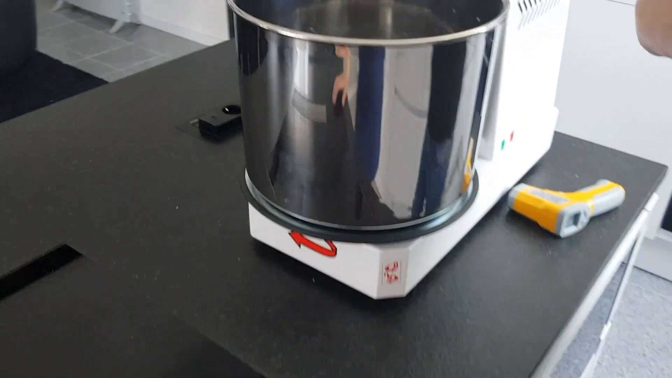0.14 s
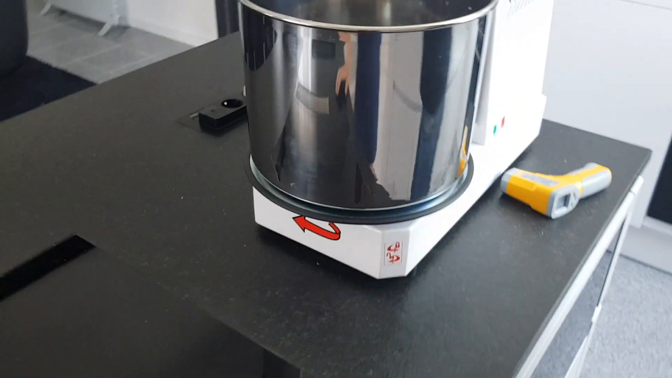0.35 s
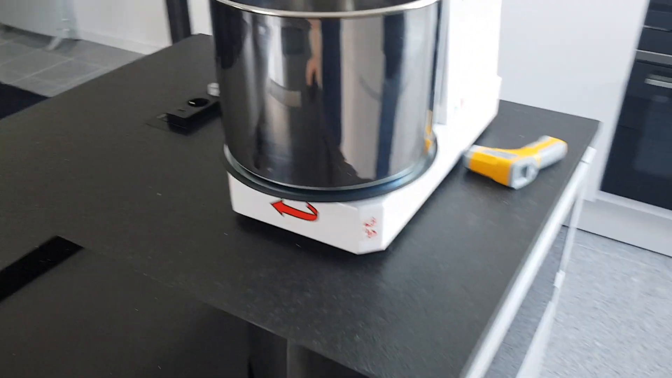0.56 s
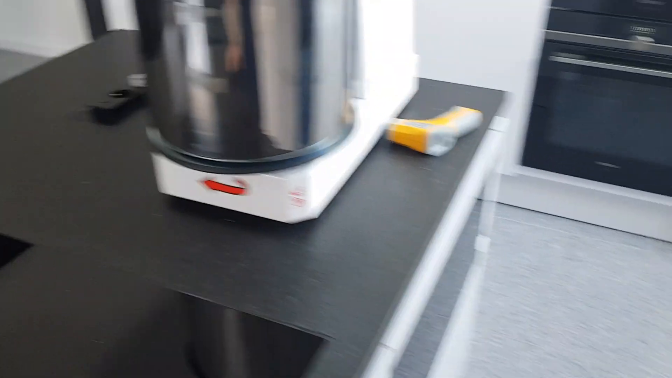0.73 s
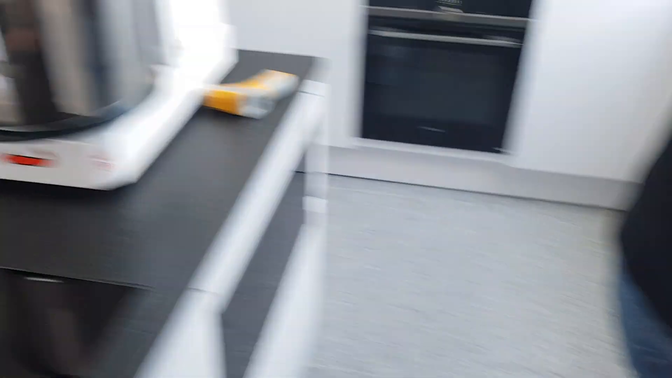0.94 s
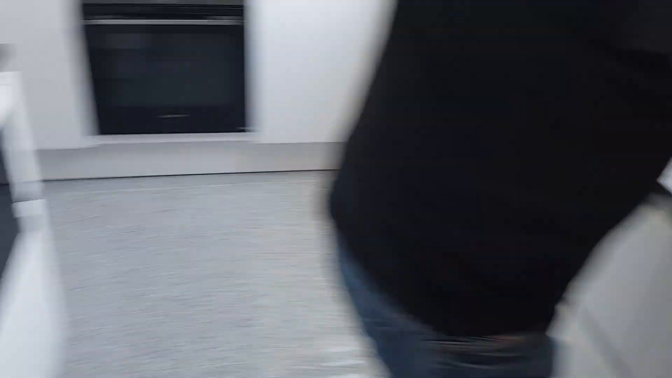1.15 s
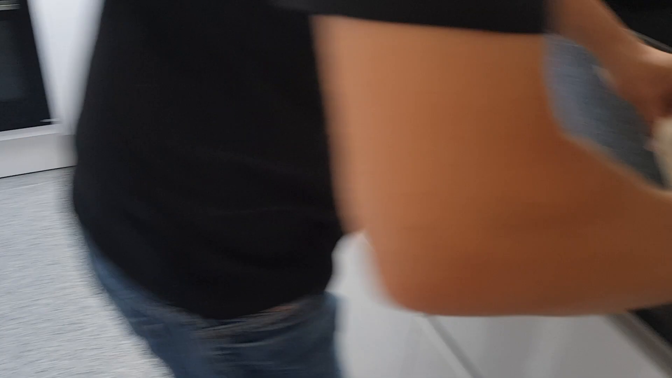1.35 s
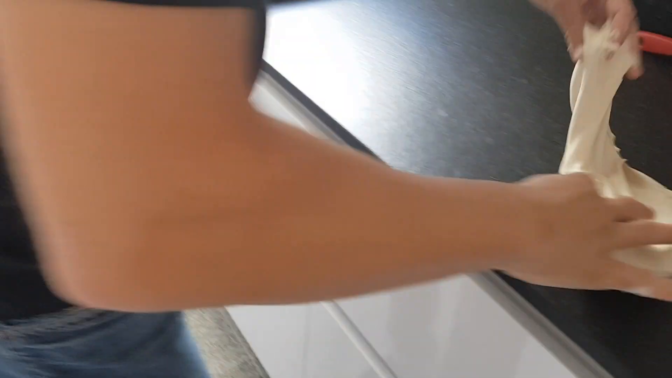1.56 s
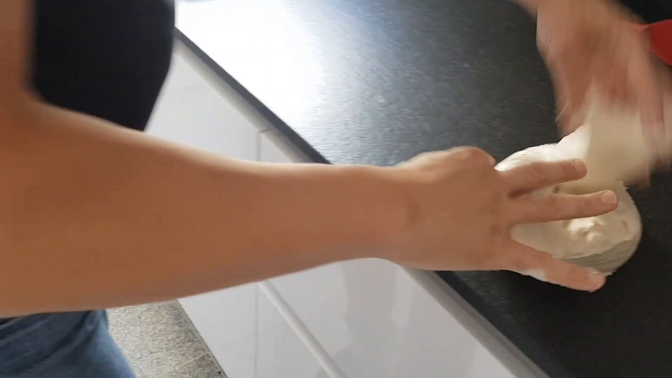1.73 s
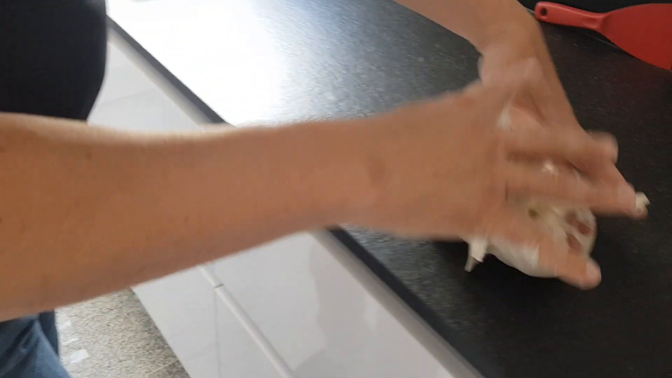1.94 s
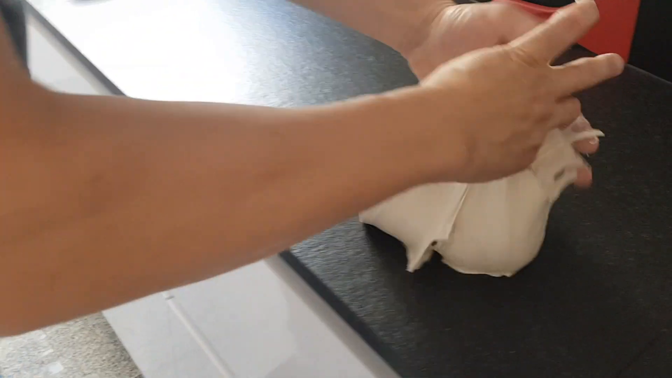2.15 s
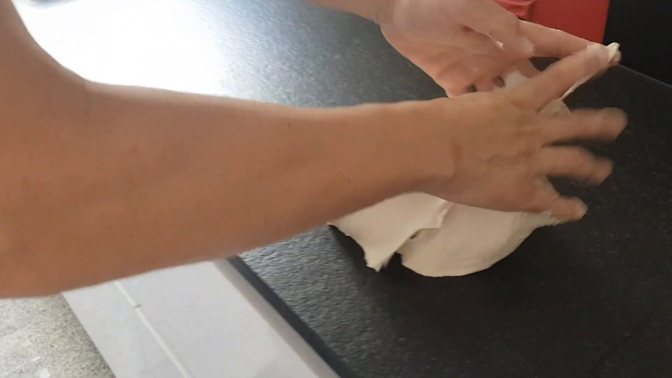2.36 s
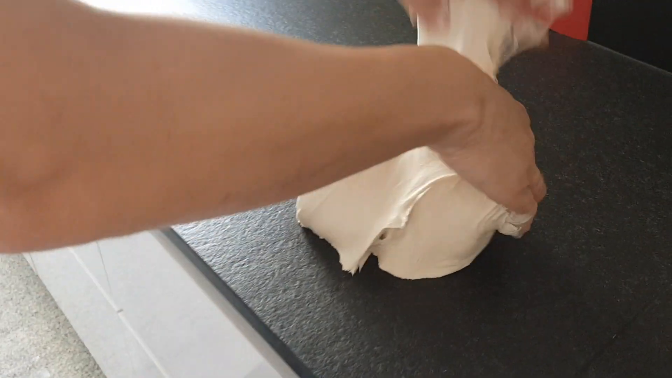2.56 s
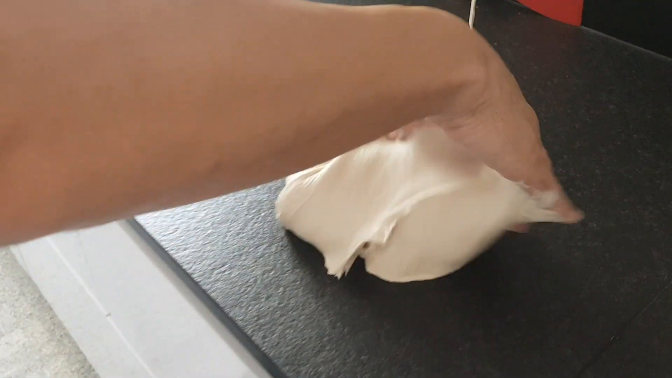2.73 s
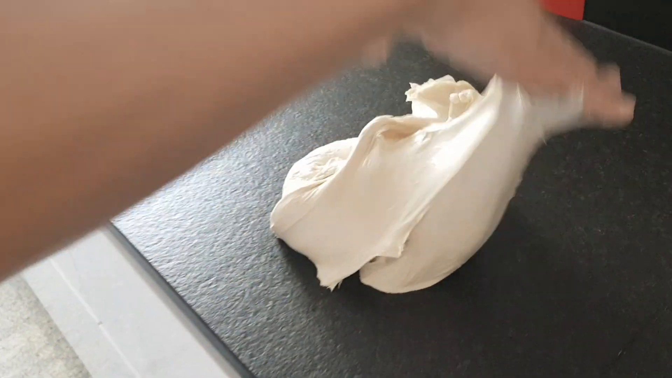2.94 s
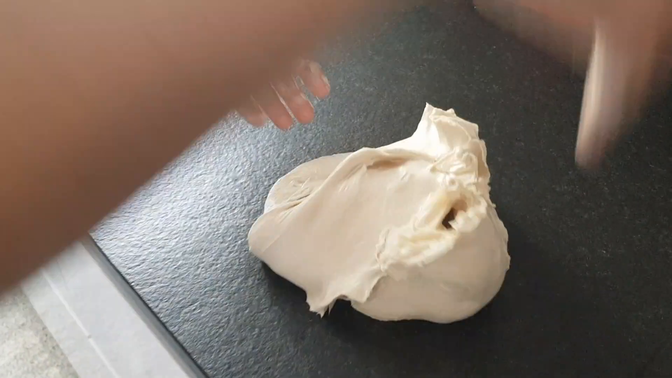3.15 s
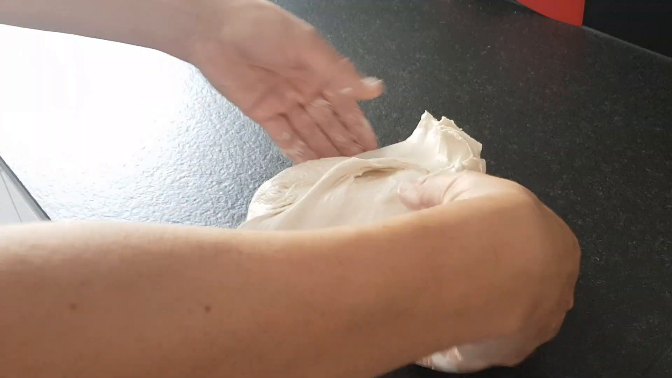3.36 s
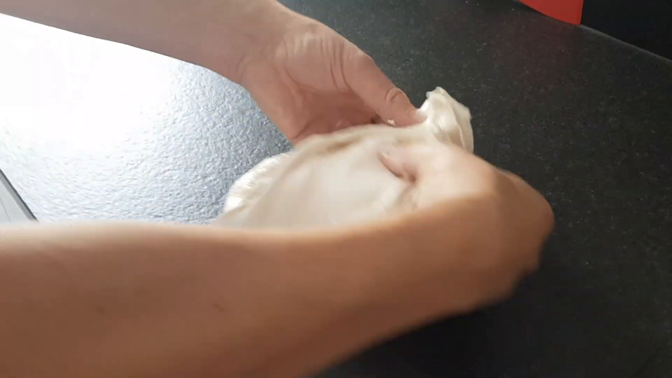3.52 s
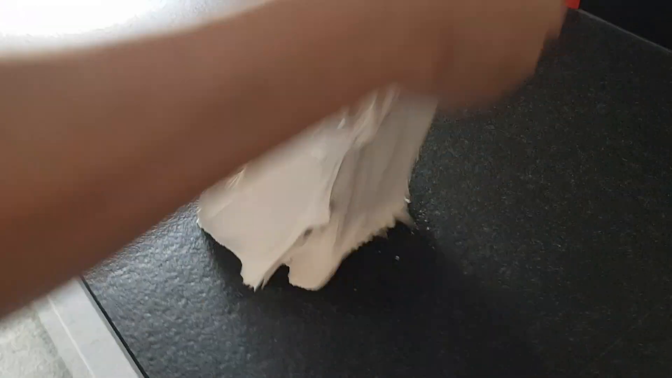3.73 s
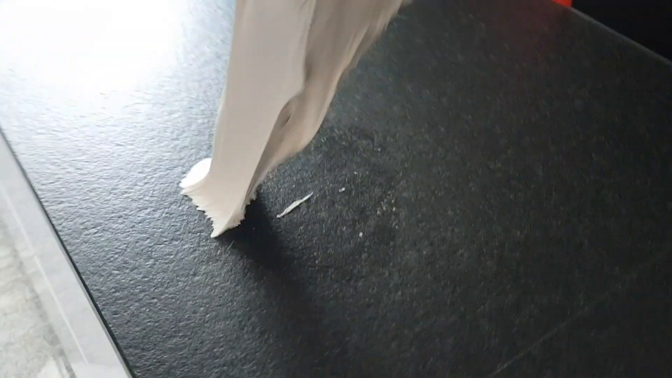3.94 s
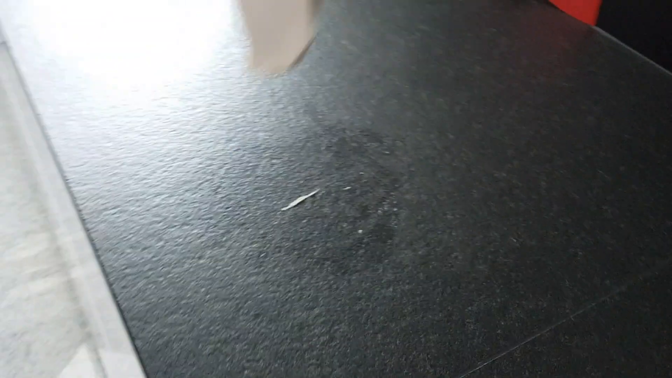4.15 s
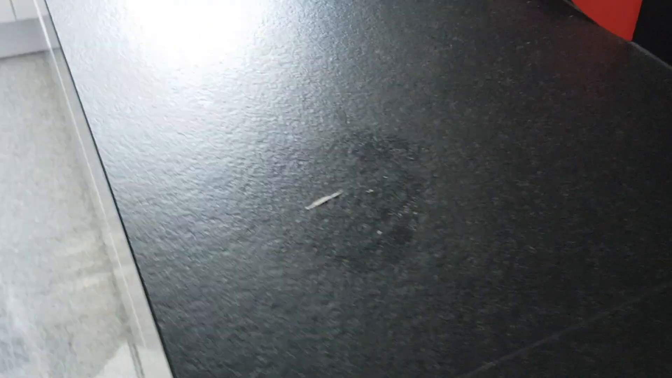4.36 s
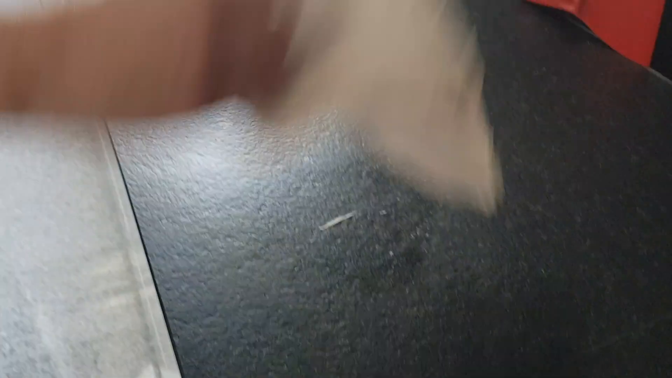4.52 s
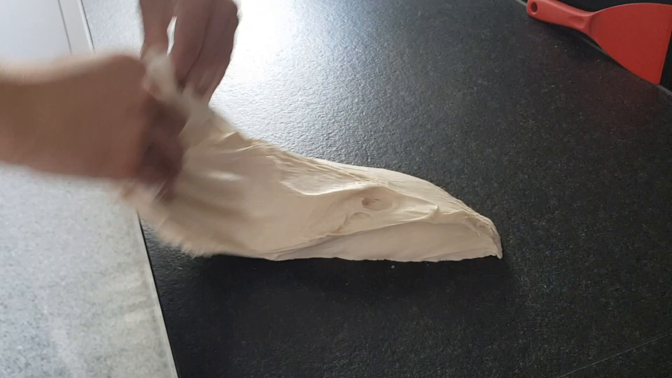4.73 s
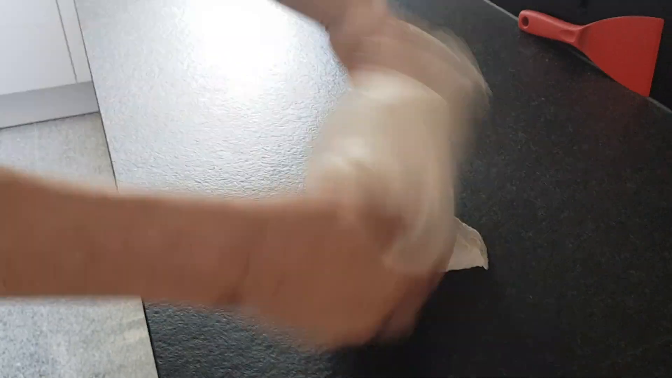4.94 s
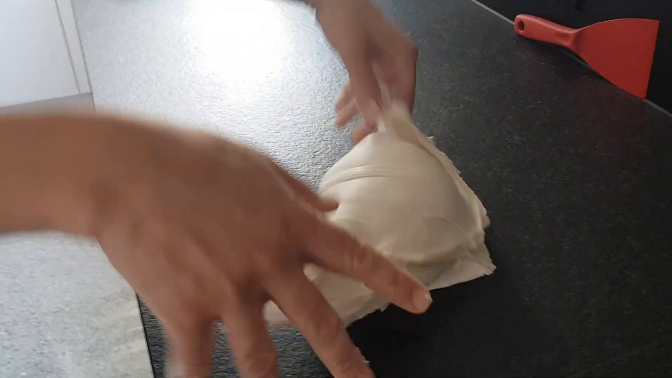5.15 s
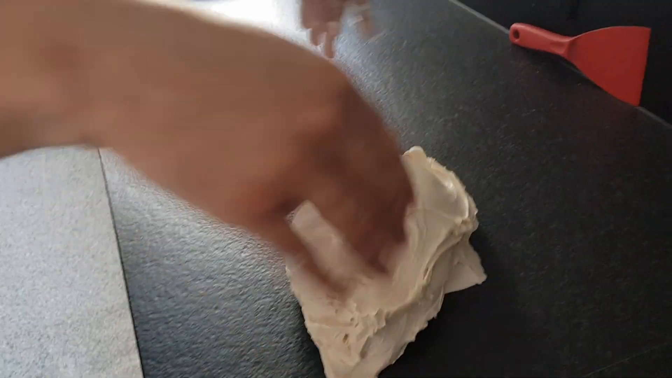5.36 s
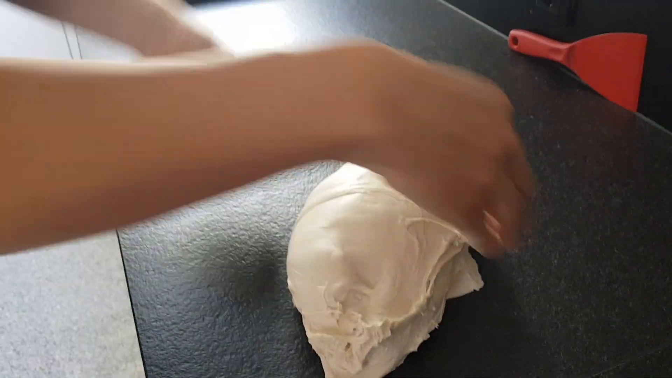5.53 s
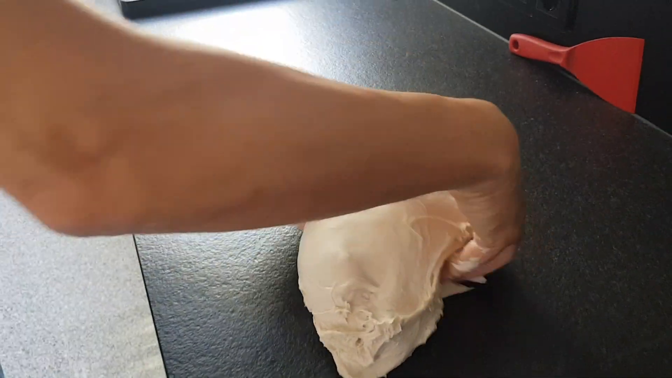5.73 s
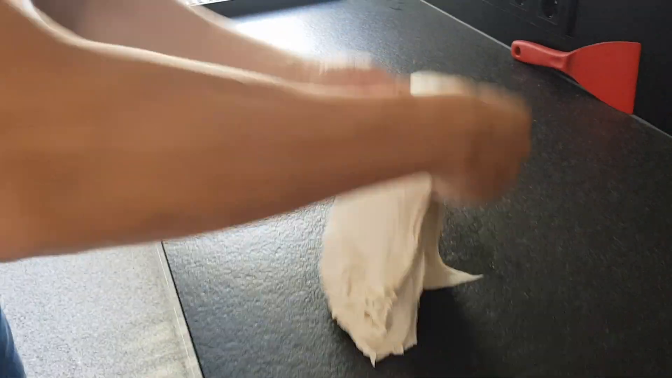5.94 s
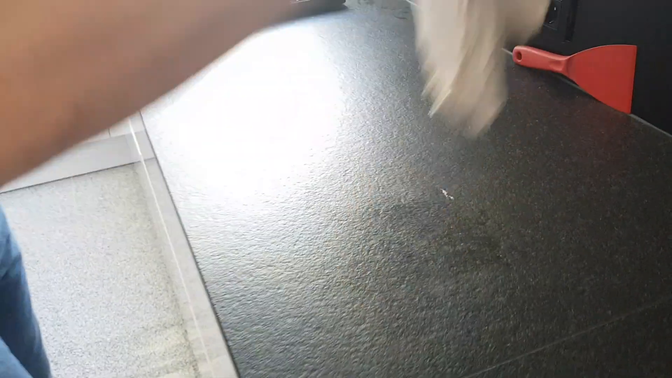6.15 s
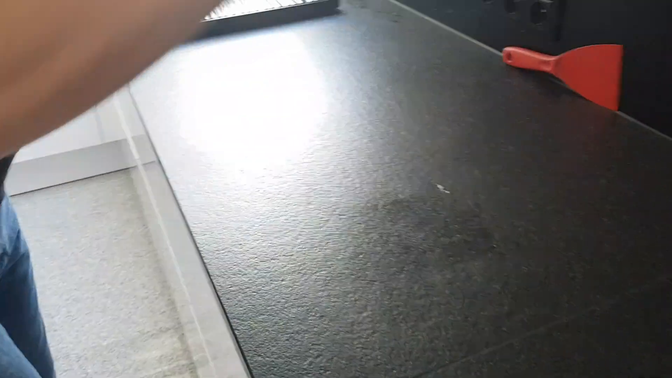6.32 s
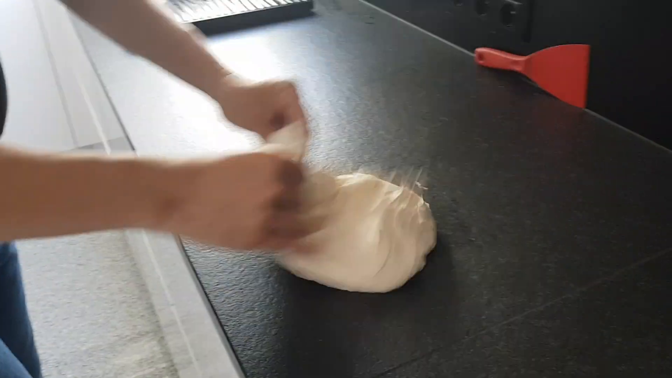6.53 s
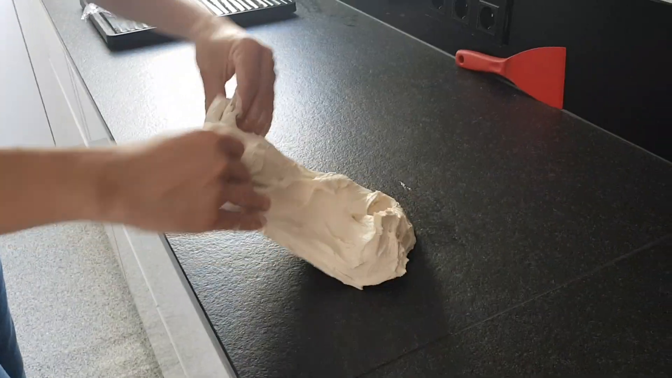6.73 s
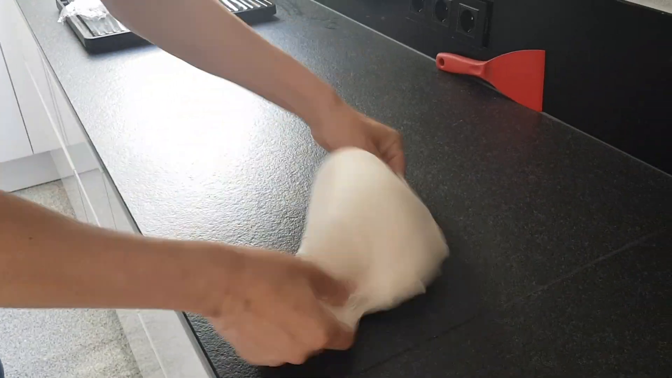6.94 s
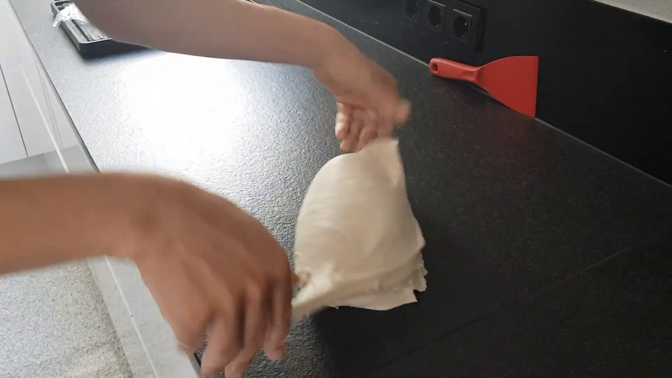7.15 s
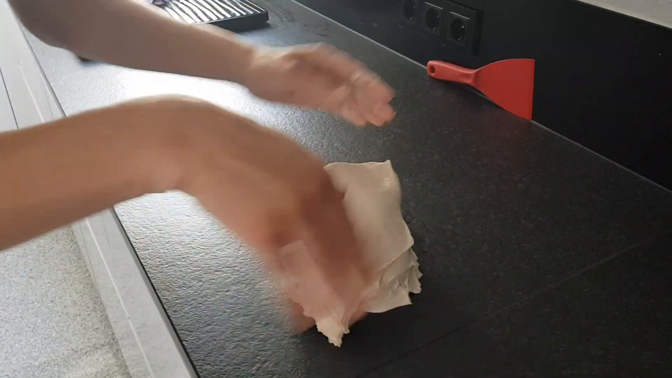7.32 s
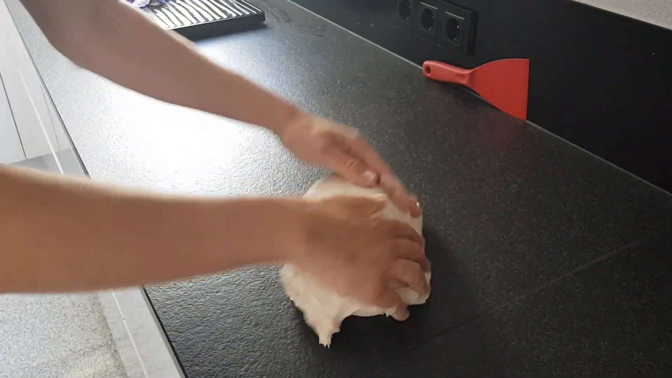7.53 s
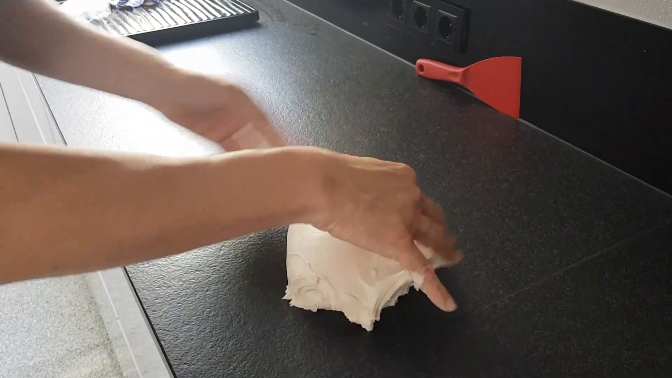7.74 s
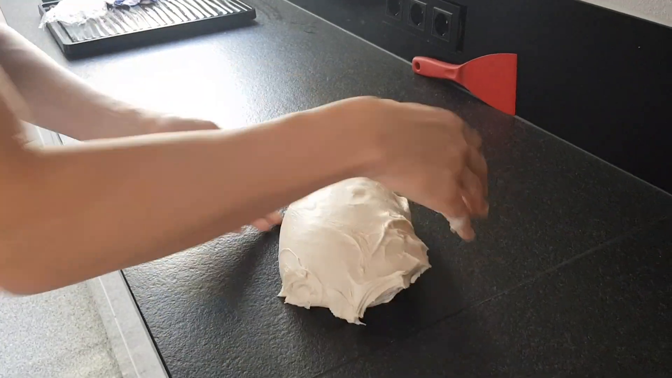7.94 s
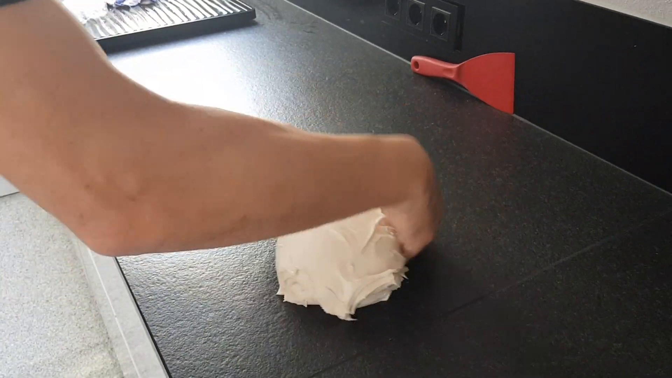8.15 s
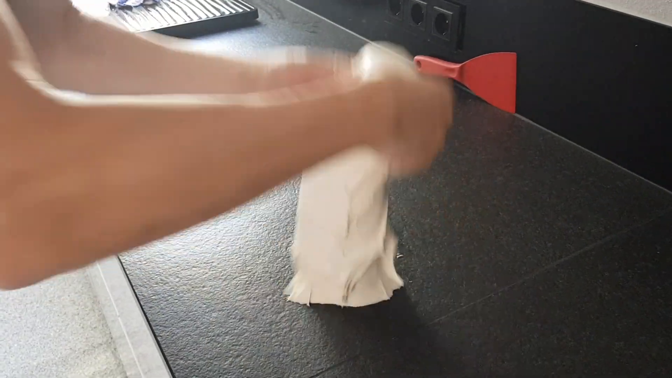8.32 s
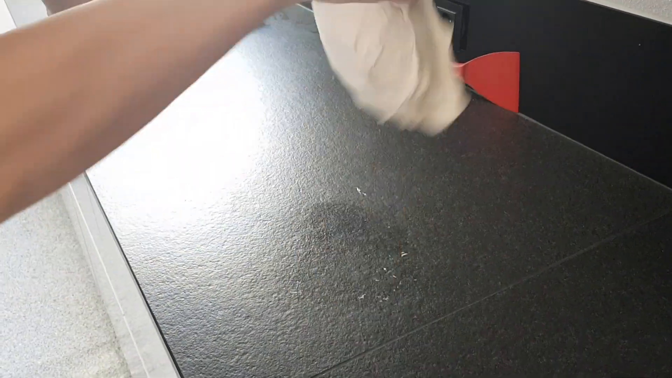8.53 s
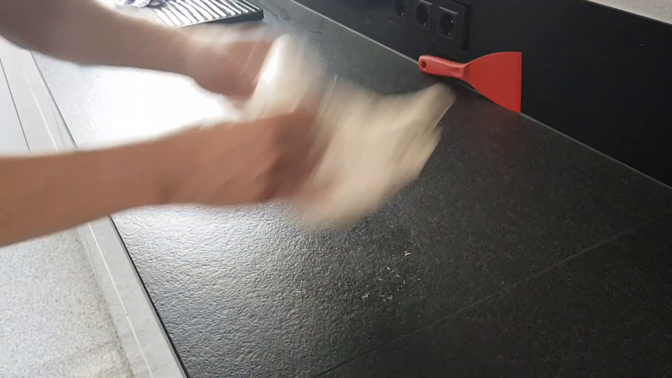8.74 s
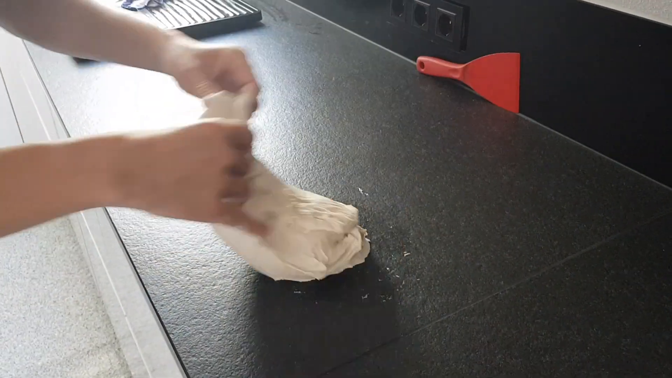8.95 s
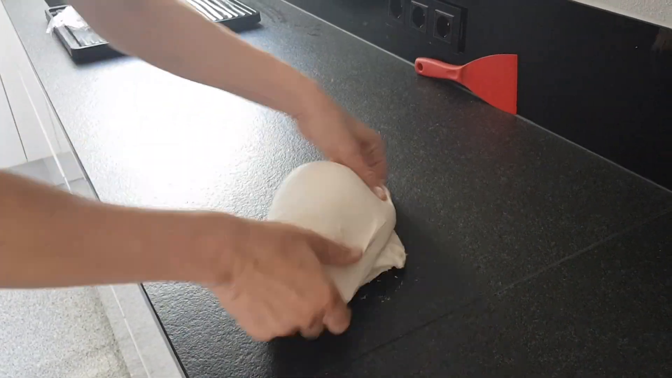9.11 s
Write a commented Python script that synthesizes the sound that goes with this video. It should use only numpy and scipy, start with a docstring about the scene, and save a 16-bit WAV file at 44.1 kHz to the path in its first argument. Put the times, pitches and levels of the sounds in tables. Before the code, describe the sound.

A very quiet low fridge hum and soft airy room tone run throughout a reflective kitchen. At about 0.3 s there is a soft smack and sticky rustle, then faint thin squeaks from 0.7 s and a hollow cupboard bump with a rattle at 1.0 s. Light pats and hand or cloth rustles follow, with duller dough presses around 3.3-3.5 s. From 3.75 to 4.5 s a finger rubs and clicks the microphone case, dry, close and mostly right. At 4.56 s dough slams onto stone: a popping wet smack, crackle and deep counter thud, with a short room tail. Another strong slap lands at 4.98 s, then softer folding. A heavy slap hits at 6.5 s, a milder one at 6.93 s, then pats and sticky rustle. At 8.05 and 8.27 s come light presses, at 8.75 s a weighty slap, then faint squeaks and a softer double slap near 9.08 s.

```python
"""In a hard-walled kitchen, soft dough is pulled, folded and slapped onto a stone counter.
Each slap is an air pop, a wet crackle and a ringing thud; sticky hands and cloth are banded noise.
A fridge hums with sines over airy noise, faint squeaks waver, and a cupboard front is bumped.
A finger rubs and taps the hand-held phone near its right microphone for a moment."""
import sys
import numpy as np
from scipy import signal
from scipy.fft import rfft, irfft
from scipy.io import wavfile
from scipy.ndimage import uniform_filter1d

SR = 44100
rng = np.random.default_rng(int(sys.argv[2]) if len(sys.argv) > 2 else 0)


def wrap_up_sound(samples):
    """Save the sound to the file named by the first command line argument, as 16-bit audio."""
    columns = np.atleast_2d(samples).T
    # keep every value between -1 and 1, then stretch to whole-number steps
    tamed = np.clip(columns, -1, 1)
    steps = np.round(tamed * 32767).astype(np.int16)
    wavfile.write(sys.argv[1], SR, steps)


N = 404838


def amp(db):
    """Turns decibels into gain."""
    return 10 ** (np.asarray(db) / 20)


def evened(x):
    """Scales to rms 1."""
    return x / np.sqrt(np.mean(x ** 2) + 1e-20)


def read(points, hz):
    """Reads between a table's points, on a log-frequency axis."""
    f, value = np.transpose(points)
    return np.interp(np.log(hz + 1), np.log(f + 1), value)


def add(mix, s, sound):
    """Mixes a stereo sound in at time s, in seconds."""
    part = mix[:, round(s * SR):][:, :sound.shape[1]]
    part += sound[:, :part.shape[1]]


def panned(db):
    """Left and right gains for a level difference (plus is left)."""
    return amp(np.array([db / 2, -db / 2]))


def grid(count, size):
    """Frequencies (column) and times (row) of short-time spectra covering count samples."""
    hz = np.fft.rfftfreq(size, 1 / SR)[:, None]
    return hz, np.arange(4 * count // size + 5) * size / 4 / SR


# How alike the two ears are in sound that comes from all around.
# Each row: frequency in Hz, left-right likeness from 0 to 1.
LIKENESS = [(60, .97), (130, .93), (290, .85), (640, .55), (1400, .05), (15000, 0)]


def noise(gain, count):
    """Diffuse stereo noise shaped by gain (bins x frames); unit gain gives rms 1."""
    bins, frames = gain.shape[-2:]
    a, b, c, d = rng.standard_normal((frames, bins, 4)).T
    same = np.clip(read(LIKENESS, np.linspace(0, SR / 2, bins)), 0, 1)[:, None]
    left = a + 1j * b
    right = same * left + np.sqrt(1 - same ** 2) * (c + 1j * d)
    size = 2 * bins - 2
    spectra = np.array([left, right]) * gain * np.sqrt(3 / size)
    return signal.istft(spectra, nperseg=size, noverlap=3 * size // 4)[1][:, :count]


def shelves(hz, low_hz, low_db, high_hz, high_db):
    """Lifts the bass below one corner and the treble above another, in dB."""
    return low_db / (1 + (hz / low_hz) ** 6) + high_db / (1 + (high_hz / (hz + 1)) ** 6)


def per_band(db):
    """Shifts a spectrum in dB so that its mean power is 1."""
    return db - 10 * np.log10(np.mean(amp(db) ** 2))


def jerks(t):
    """Uneven strength from one moment to the next, with rare strong peaks."""
    return np.minimum(rng.exponential(1, len(t)), 5) - 1


def patches(hz, t, frames):
    """Random patches of strong and weak sound, smoothed over 4 bins and some frames."""
    rough = rng.standard_normal((len(t), len(hz))).T
    return evened(uniform_filter1d(uniform_filter1d(rough, size=4, axis=0), size=frames, axis=1))


# How long the kitchen keeps sounding.
# Each row: frequency in Hz, time to die by 60 dB in seconds.
ROOM = [(60, 1), (160, 0.41), (420, 0.63), (1100, 0.54), (2900, 0.71), (7700, 0.51), (15000, .4)]


def echo(x, wet_db):
    """The kitchen answers with a fresh diffuse tail, each band dying at its own speed."""
    hz, t = grid(SR, size=256)
    tail = noise(amp(-60 * t / read(ROOM, hz)), SR)
    tail *= np.clip((np.arange(SR) / SR - 0.003) / 0.0026, 0, 1)  # first walls a few ms away
    return amp(wet_db) * signal.fftconvolve(x[None], tail / np.linalg.norm(tail[0]), axes=1)


COMPRESSOR_HZ, MAINS_HZ = 37.5, 100
MAINS_DB, AIR_DB = -82, -72.5  # rms levels
# The compressor's two main tones, heard unevenly as the phone moves through the room.
# Each row: time in seconds, level in dB of three times the turn rate, level in dB of four times.
HUM = [(0.0, -77, -85), (0.66, -75, -107), (0.999, -68.5, -90.5), (4.059, -67.5, -72.5),
       (5.059, -73, -88.5), (7.92, -71.5, -76), (9.18, -81, -73)]
# Weaker tones of the compressor. Each row: multiple of the turn rate, level in dB.
WEAK_TONES = [(5, -91.5), (6, -91), (7, -89)]
# Colour of the room's air. Each row: frequency in Hz, relative strength in dB per Hz.
AIR = [(15, -38.5), (25, -15.5), (58, -9), (90, -6), (118, -5.5), (538, -33), (1030, -36), (1320, -34.5),
       (3910, -42.5), (4360, -46), (5130, -31.5), (8600, -41.5), (10700, -31), (15200, -30.5),
       (16500, -40.5)]


def fridge():
    """Multiples of the compressor's turn rate and the mains buzz, over the air of the room."""
    t = np.arange(N) / SR
    s, third_db, fourth_db = np.transpose(HUM)
    tones = [(3, np.interp(t, s, third_db)), (4, np.interp(t, s, fourth_db))] + WEAK_TONES
    hum = sum(amp(db) * np.sin(2 * np.pi * (k * COMPRESSOR_HZ * t + rng.random())) for k, db in tones)
    waver = evened(uniform_filter1d(uniform_filter1d(rng.standard_normal(N), 2500), 2500))
    hum *= amp(2.6 * waver)
    hum += amp(MAINS_DB) * np.sin(2 * np.pi * MAINS_HZ * t)
    hz, frames = grid(N, size=2048)
    air = noise(amp(read(AIR, hz) + 0 * frames), N)
    return np.sqrt(2) * hum + amp(AIR_DB) * evened(air)  # sqrt(2) turns rms into sine height


# Colour of sticky hands and cloth. Each row: frequency in Hz, relative strength in dB per Hz.
RUSTLE = [(200, 12), (2200, 9.5), (5500, 6.5), (8500, 5), (11000, 13.5), (15500, 2), (16500, -44)]
# Sticky hands and cloth moving. Each row: start in seconds, length in seconds, level in dB before
# the flicker, low edge in Hz, high edge in Hz, left-right difference in dB.
STROKES = [(0, 0.011, -64.5, 1450, 3860, -0.5), (0.254, 0.018, -77, 300, 1030, -2),
           (0.275, 0.044, -72.5, 1500, 8000, 3), (0.34, 0.041, -54.5, 710, 4000, 0),
           (0.5, 0.17, -76, 1420, 3100, -9), (0.63, 0.21, -74.5, 2930, 14900, 1),
           (1.364, 0.065, -66, 1500, 3460, -6.5), (1.996, 0.26, -76.5, 2800, 7500, 0.5),
           (2.199, 0.044, -68, 1850, 3500, -2), (2.6, 0.12, -67.5, 3330, 15000, -2),
           (2.657, 0.091, -71, 1800, 4470, -6), (2.955, 0.089, -63.5, 1750, 6300, -1),
           (3.211, 0.17, -70, 2050, 5700, 4.5), (3.263, 0.15, -61.5, 250, 1420, -3.5),
           (3.47, 0.071, -62.5, 1800, 4040, 2.5), (3.602, 0.27, -67.5, 1000, 15000, -1.5),
           (5.569, 0.15, -72.5, 405, 1263, 4), (5.651, 0.071, -72.5, 400, 3550, 0),
           (5.78, 0.21, -76.5, 1500, 12060, 4), (5.943, 0.044, -67.5, 792, 3550, 2.5),
           (5.996, 0.0089, -71, 1000, 14000, -2), (6.411, 0.053, -73, 2200, 4500, 7.5),
           (6.874, 0.021, -62.5, 1520, 4460, 2), (7.728, 0.063, -72.5, 2200, 9040, 8),
           (7.939, 0.066, -65, 1510, 6000, 6), (7.941, 0.064, -69.5, 300, 900, 0),
           (8.112, 0.33, -74, 1500, 4100, -1), (8.286, 0.1, -64, 600, 12000, 1)]


def strokes():
    """Each stroke rustles in its own band and dies away with the room; sticky snaps make it flicker."""
    hz, t = grid(N, size=256)
    power = np.zeros((2, len(hz), len(t)))
    lead_s = 0.015  # the swell begins this early
    for s, length_s, level_db, low_hz, high_hz, pan_db in STROKES:
        below_db = 18 * np.log2(np.maximum(low_hz / (hz + 20), 1))  # 18 dB per octave
        above_db = 13 * np.log2(np.maximum(hz / high_hz, 1))
        colour_db = per_band(read(RUSTLE, hz) - (below_db + above_db))
        on = (t > s - lead_s) & (t < s + length_s + 0.4)
        fade_db = 60 * np.maximum(t[on] - s - length_s, 0) / read(ROOM, hz)
        swell = np.minimum((t[on] - s + lead_s) / (lead_s + 0.4 * length_s), 1) ** 1.5
        shape = amp(level_db + colour_db - fade_db) * swell
        power[:, :, on] += (shape * panned(pan_db)[:, None, None]) ** 2
    snaps_db = 1.6 * jerks(t) + 2.4 * patches(hz, t, frames=16)
    return noise(np.sqrt(power) * amp(snaps_db), N)


def ringing(modes, heft_db):
    """Modes set going by a soft blow; a heavy one reaches the deep modes."""
    t = np.arange(SR) / SR
    ring = np.zeros(SR)
    for hz, db, t60 in modes:
        lean_db = shelves(hz, 110, heft_db, 1, 0) + 1.5 * rng.standard_normal()  # each blow differs
        ring += amp(db + lean_db - 60 * t / t60) * np.sin(2 * np.pi * hz * t)
    return ring * np.minimum(t / 0.0026, 1)


# Colour of the wet crackle. Each row: frequency in Hz, relative strength in dB per Hz.
SPLAT = [(120, -37.5), (200, -17), (342, -10.5), (426, -8.5), (979, -7.5), (1090, -7.5), (1200, -10),
         (2130, -13), (5870, -14), (15300, -13), (16500, -52.5)]
# Broad rings of the stone slab. Each row: centre in Hz, width in Hz, lift in dB.
KNOCK = [(690, 120, -1.5), (1620, 250, 3), (2130, 570, 6), (5000, 3100, 6)]


def burst(treble_db, corner_hz, length_s=0.0093):
    """Wet surface clapping shut: fast-dying crackle for each ear, and one clean clap for the room."""
    t = np.arange(4096) / SR
    bumpy = amp(0.51 * rng.exponential(1, (3, 256)).repeat(16, axis=1))
    grains = rng.standard_normal((3, 4096)) * bumpy
    grains *= np.exp(-t / length_s) * np.minimum(t / 0.0036, 1)
    grains[2] = np.arange(4096) == 88  # a single click makes the clean clap
    hz = np.fft.rfftfreq(8192, 1 / SR)
    rings_db = sum(db / (1 + ((hz - f) / (width / 2)) ** 2) for f, width, db in KNOCK)
    colour = amp(read(SPLAT, hz) + rings_db + shelves(hz, 1, 0, corner_hz, treble_db))
    smack = irfft(rfft(grains, 8192) * colour)[:, :4096]
    smack *= np.sqrt(length_s * SR) / 2 / np.linalg.norm(smack, axis=1)[:, None]  # equal energy
    return smack[:2], smack[2]


def cycles(hz, turns):
    """A few cycles that swell at once and fade: trapped air popping out, or a stiff case clicking."""
    u = np.arange(4096) * hz / SR
    fade = np.exp(-np.maximum(u - 0.9, 0) / turns)
    return np.sin(2 * np.pi * u) * np.minimum(u / 0.88, 1) ** 2 * fade


FIRM_DB, ECHO_DB, ECHO_PER_DB = -31.5, -3, -0.0558  # firm smack, its echo, echo change per dB of smack
PUSH_HZ, PUSH_DB = 171, 5  # the dough's dead push on the slab, against the ring
# The slab and the cupboards under it.
# Each row: frequency in Hz, relative level in dB, time to die by 60 dB in seconds.
COUNTER = [(52, -6, 0.47), (68.6, -12.5, 0.097), (84.6, -6, 0.34), (109.4, -8, 0.61), (132.5, -9.5, 0.31),
           (160, -1.5, 0.053), (213, -4.5, 0.18), (266.4, -2, 0.24), (352.5, -9, 0.27), (464, -7.5, 0.072),
           (683, -18, 0.46), (723, -21, 0.36)]
# Dough and hands hitting stone. Each row: start in seconds, smack level in dB, air pop in dB against
# the smack, air pop in Hz, treble lift in dB, thud level in dB, heft (deep lift) in dB,
# left-right difference in dB.
SLAPS = [(0.331, -34.5, -2.5, 1730, -10.5, -78, 15, 3.5), (0.405, -37, 18, 6500, 7, -90, 0, 1.5),
         (1.396, -44.5, -13, 1670, 11, -68, 4.5, 2.5), (1.736, -58, -19, 905, 3, -71.5, -2, -2),
         (2.767, -51, -5, 2140, -1, -70, 0, -2), (3.285, -54, -5, 714, -18, -46.5, -2.5, -6),
         (3.381, -48.5, 0, 2170, -7, -63, -10, 17), (3.482, -35, -3, 2040, -16, -59, 7, -0.5),
         (4.551, -29.5, -8, 958, -12, -34, -27, -16), (4.557, -14, -2, 1693, -43, -45.5, -17.5, -3.5),
         (4.563, -10.5, -6, 1670, -5, -35.5, 1, 1), (4.978, -38.5, 12, 1610, -2, -46, -5, -4),
         (4.981, -15.5, -3, 1486, -18, -36.5, -5.5, 0.5), (5.248, -35.5, 0, 1560, 3.5, -60.5, 12, 1.5),
         (5.568, -69.5, -1, 1130, -14.5, -62.5, -0.5, -0.5), (5.628, -53.5, -7.5, 807, 7, -48, 4.5, -11),
         (5.905, -61, -10, 950, 18, -68.5, 5.5, -16), (6.495, -15.5, 0, 1654, -6.5, -31, 1.5, 0),
         (6.89, -60.5, 24.5, 3580, 17, -68.5, -6.5, 12.5), (6.925, -50.5, -6, 1180, -11, -50.5, -2, 37),
         (6.934, -28, 4, 1324, -7, -39.5, 0.5, -1), (7.279, -73.5, 16, 2040, 0, -80, 2, 1.5),
         (7.397, -49.5, -11, 786, -5, -59.5, 8, 2), (7.44, -35.5, -11.5, 914, 1.5, -58.5, 1.5, 1),
         (8.04, -53, -13, 729, 4, -47.5, -1, -14), (8.056, -39.5, -11, 2004, -7.5, -57, -11, 0),
         (8.267, -38, -9, 1520, 2.5, -67, 10, 3), (8.747, -22.5, -10.5, 1190, -3.5, -37, 8.5, 1.5),
         (9.073, -32.5, -10, 2600, -5, -45.5, 5, 0.5), (9.093, -34, -6.5, 550, -29, -42.5, 2, 4)]


def slaps():
    """Pop, crackle and counter thud for each blow, with the room behind."""
    out = np.zeros((2, N))
    for s, smack_db, pop_db, pop_hz, treble_db, thud_db, heft_db, pan_db in SLAPS:
        sides = panned(pan_db)[:, None]
        pop = amp(pop_db) * np.roll(cycles(pop_hz, turns=0.99), shift=50)
        crackle, clap = burst(treble_db, 2.43 * pop_hz)  # treble corner follows the pop's pitch
        both_pops = np.array([np.roll(pop, shift=3), pop])  # the counter is nearer the right port
        add(out, s, amp(smack_db) * (both_pops + 0.5 * crackle) * sides)
        thrown = 0.35 * pop + 0.35 * clap + 0.24 * crackle[0]  # crackle's chance colour stays in the tail
        wet_db = ECHO_DB + ECHO_PER_DB * (smack_db - FIRM_DB)  # softer blows get more room
        add(out, s, echo(amp(smack_db) * thrown, wet_db) * sides)
        thud = amp(thud_db) * ringing(COUNTER, heft_db)
        thud[:4096] += amp(thud_db + PUSH_DB) * cycles(PUSH_HZ, turns=0.43)
        add(out, s, np.array([thud, thud]) + echo(thud[:SR // 50], 0.48)[:, :SR])
    return out


# Faint squeaks. Each row: start in seconds, length in seconds, first pitch in Hz, last pitch in Hz,
# level in dB before the flicker.
SQUEAKS = [(.71, 0.078, 1830, 1812, -73.5), (.8, .11, 1810, 1800, -84), (0.878, 0.28, 2095, 2080, -77.5),
           (8.5, 0.1, 1714, 1860, -81.5), (8.601, .12, 1850, 1910, -84.5), (8.992, 0.073, 2100, 2360, -73)]


def squeaks():
    """Thin wavering tones that flicker, far off in the room."""
    out = np.zeros((2, N))
    for s, length_s, start_hz, end_hz, db in SQUEAKS:
        t = np.arange(0, length_s, 1 / SR)
        waver = evened(uniform_filter1d(rng.standard_normal(len(t)), size=200))
        flicker = evened(uniform_filter1d(rng.standard_normal(len(t)), size=900))
        hz = start_hz + (end_hz - start_hz) * t / length_s + 28.0 * waver
        tone = amp(db + 3.9 * flicker) * np.sin(2 * np.pi * np.cumsum(hz) / SR)
        tone *= signal.windows.tukey(len(t), 0.3)  # soft ends
        add(out, s, tone * np.ones((2, 1)))
        add(out, s, echo(tone, -2.5))
    return out


# The hollow panel's tones.
# Each row: frequency in Hz, relative level in dB, time to die by 60 dB in seconds.
CUPBOARD = [(67, -3.5, 0.42), (93.5, 2.5, 0.3), (186, -0.5, 0.27), (307.5, -3.5, 0.22), (400, -2.5, 0.1),
            (491, -6, 0.061), (626, -8, 0.1)]
# A cupboard front is bumped. Each row: start in seconds, rattle level in dB, boom level in dB.
BUMPS = [(1.03, -37.5, -44), (1.043, -33, -45)]


def cupboard():
    """A hollow panel booms and its fittings rattle."""
    out = np.zeros((2, N))
    for s, rattle_db, boom_db in BUMPS:
        rattle, clap = burst(treble_db=0.36, corner_hz=6100)
        boom = amp(boom_db) * ringing(CUPBOARD, heft_db=-0.5)
        add(out, s, amp(rattle_db) * rattle)
        add(out, s, echo(amp(rattle_db) * clap, 0.28))
        add(out, s, np.array([boom, boom]) + echo(boom[:SR // 60], 6.5)[:, :SR])
    return out


HISS_DB, HISS_PER_DB = -15.5, 0.54  # the hiss follows the scratch
# Finger strokes on the phone's case. Each row: start in seconds, swell in seconds, hold in seconds,
# fade (20 dB down) in seconds, level in dB before treble and jerks, scratch (treble lift) in dB.
RUB = [(3.748, 0.0032, 0.0084, 0.21, -50.5, -4.5), (3.811, 0.0065, 0.005, 0.033, -56, 15.5),
       (3.902, 0.0071, 0.042, 0.23, -42.5, -3), (4.029, 0.057, 0.093, 0.064, -48.5, 5),
       (4.245, 0.024, 0.085, 0.1, -40.5, -2), (4.345, .03, 0.01, 0.34, -49.5, 11.5),
       (4.39, 0.039, 0.012, 0.08, -33, -11.5)]
# How the rub leans to one side. Each row: frequency in Hz, left-right difference in dB.
RUB_SIDE = [(60, 1.5), (150, -12), (380, -20), (950, -26.5), (2380, -11), (5980, 0), (15000, -10.5)]
# Finger taps on the case. Each row: start in seconds, click level in dB, left pitch in Hz, right pitch
# in Hz, left-right difference in dB, tick in dB against the click, push level in dB, push pitch in Hz.
TAPS = [(3.8184, -15.5, 1730, 1540, -14, -8, -34.5, 81), (3.9113, -13, 3050, 730, -9.5, -11, -36, 81),
        (4.282, -38, 600, 392, -26, -20, -31.5, 212)]


def finger():
    """Rubbing and taps reach the microphones through the case: dry, and mostly on the right."""
    hz, t = grid(N, size=256)
    slips_db = 2.0 * jerks(t) + 1.6 * patches(hz, t, frames=20)  # stick-slip jerks, patchy scrape
    treble_loss_db = 3.0 * np.log2(np.maximum(hz, 300) / 300)
    bass_loss_db = 31.0 * np.log2(np.maximum(450 / (hz + 20), 1))
    slope_db = per_band(-treble_loss_db - bass_loss_db)
    power = 1e-20
    for s, swell_s, hold_s, fade_s, level_db, scratch_db in RUB:
        hiss_db = HISS_DB + HISS_PER_DB * scratch_db
        fade_db = 20 * np.maximum(t - s - swell_s - hold_s, 0) / fade_s
        stroke = np.clip((t - s) / swell_s, 0, 1) * amp(-fade_db)
        lift_db = shelves(hz, 1, 0, 1000, scratch_db) + shelves(hz, 1, 0, 4300, hiss_db)
        power = power + (stroke * amp(level_db + slope_db + lift_db)) ** 2
    rub_db = 10 * np.log10(power)
    side_db = read(RUB_SIDE, hz)
    both_db = np.array([rub_db + np.minimum(side_db, 0), rub_db - np.maximum(side_db, 0)])
    out = noise(amp(both_db + slips_db), N)
    for s, click_db, left_hz, right_hz, pan_db, tick_db, push_db, push_hz in TAPS:
        tick = amp(tick_db) * (cycles(11000, turns=2.1) + 0.73 * cycles(3800, turns=0.67))
        click = np.array([cycles(left_hz, turns=1.2), cycles(right_hz, turns=0.13)]) + tick
        u = np.arange(4096) * push_hz / SR
        push = np.sin(2 * np.pi * u) * np.exp(-u / 0.51)  # the case gives under the finger
        add(out, s, (amp(click_db) * click + amp(push_db) * push) * panned(pan_db)[:, None])
    return out


def scene():
    """All sources at the two microphones."""
    return fridge() + strokes() + slaps() + squeaks() + cupboard() + finger()


BASS_HZ, EDGE_HZ = 36, 16100  # deep bass is lost below one, treble above the other
# The two microphone ports. Each row: frequency in Hz, left-right difference in dB.
PORTS = [(300, 1), (700, 1), (1400, 2.5), (3100, 7), (6800, -2), (15000, -1.5)]


def record(dry):
    """The two ports colour the sound differently; deep bass is lost, then the band limit."""
    ratio = np.fft.rfftfreq(N, 1 / SR) / BASS_HZ
    bass_cut = ((1j * ratio) ** 2 / (1 + 1.3j * ratio - ratio ** 2)) ** 2
    port_gains = panned(read(PORTS, ratio * BASS_HZ))
    ported = irfft(rfft(dry) * port_gains * bass_cut, N)
    band_limit = signal.firwin(127, EDGE_HZ, window=("kaiser", 9), fs=SR)
    return signal.oaconvolve(ported, band_limit[None], "same")


dry = scene()
out = record(dry)
wrap_up_sound(out)
```